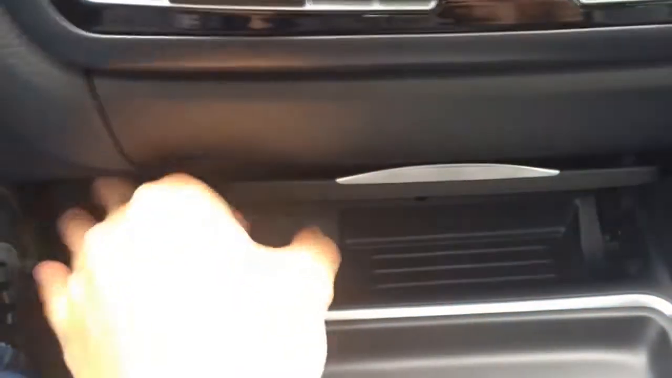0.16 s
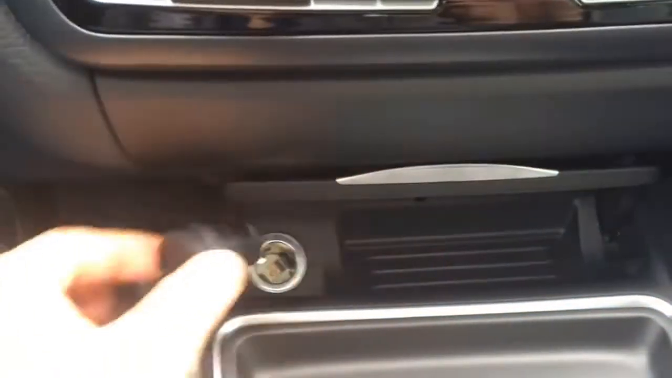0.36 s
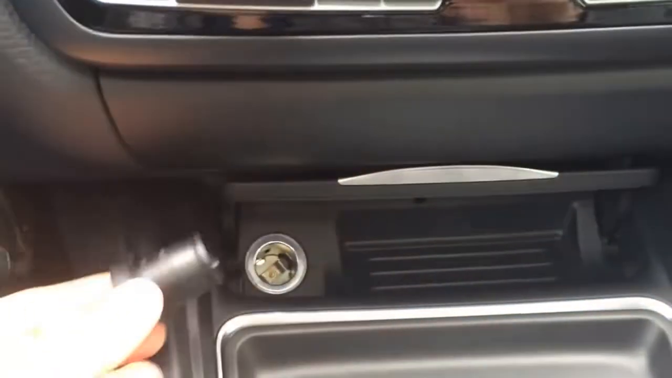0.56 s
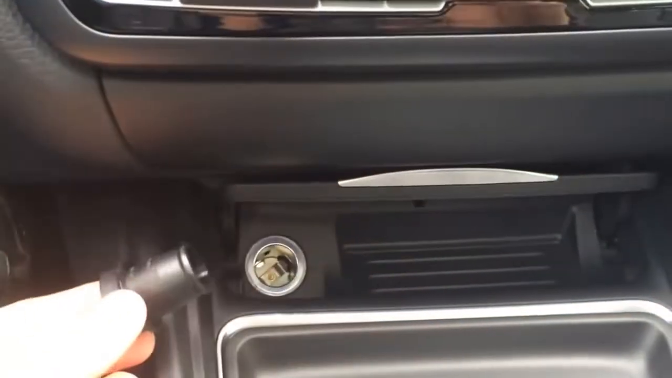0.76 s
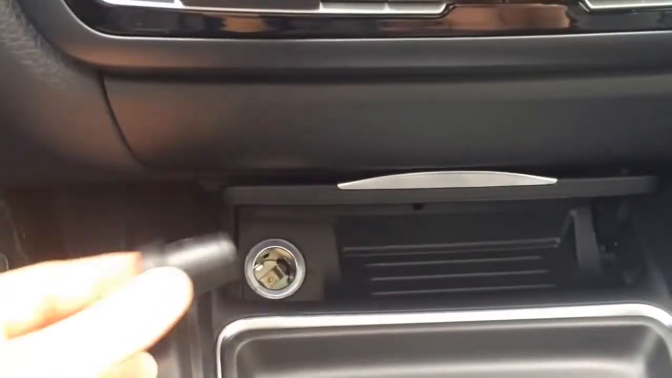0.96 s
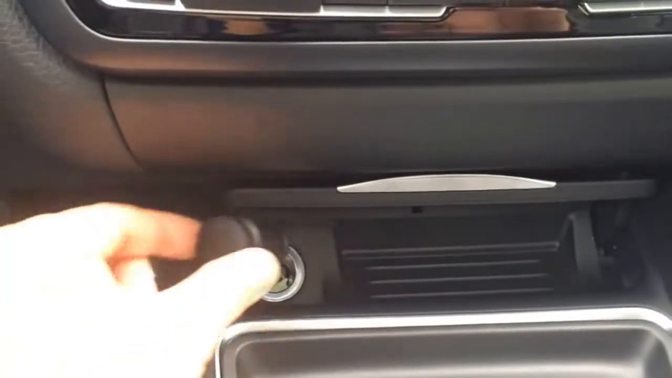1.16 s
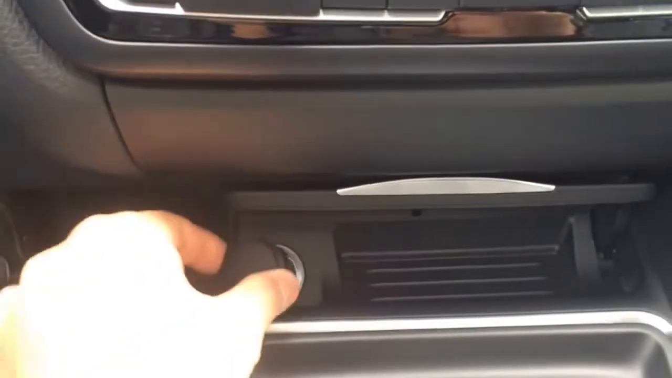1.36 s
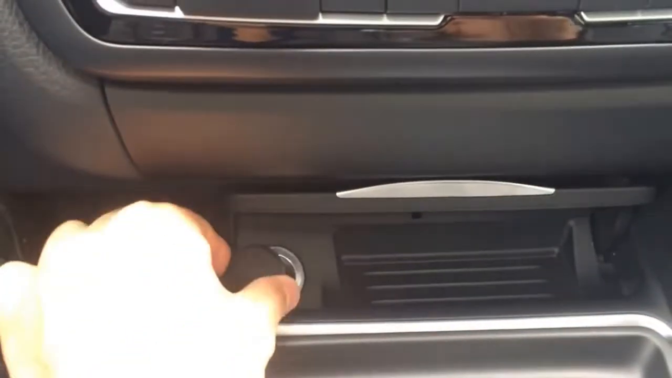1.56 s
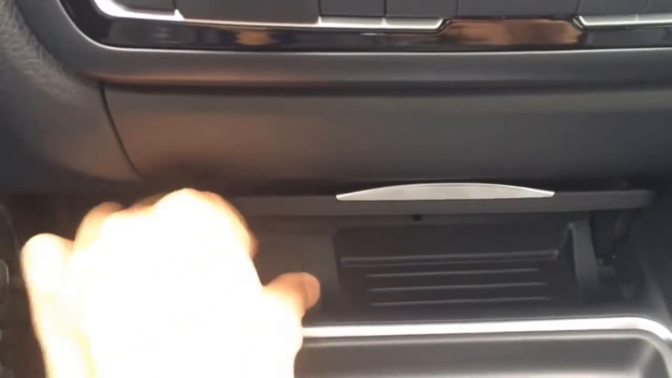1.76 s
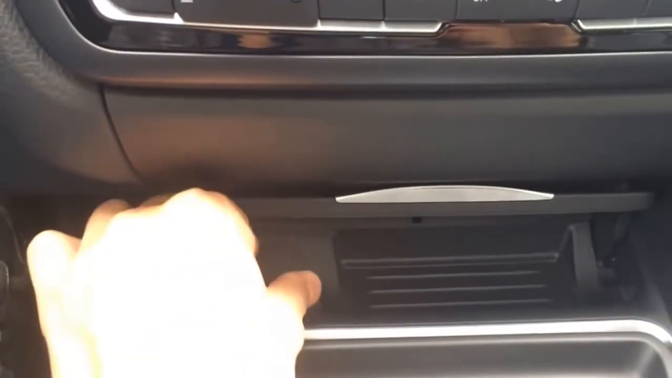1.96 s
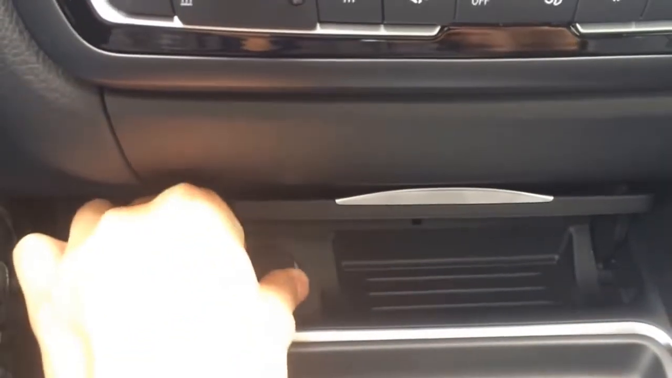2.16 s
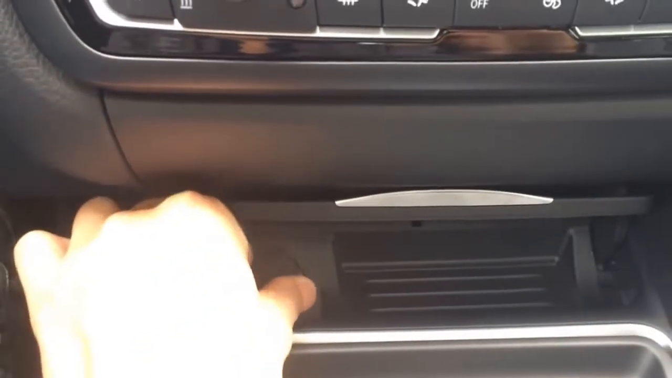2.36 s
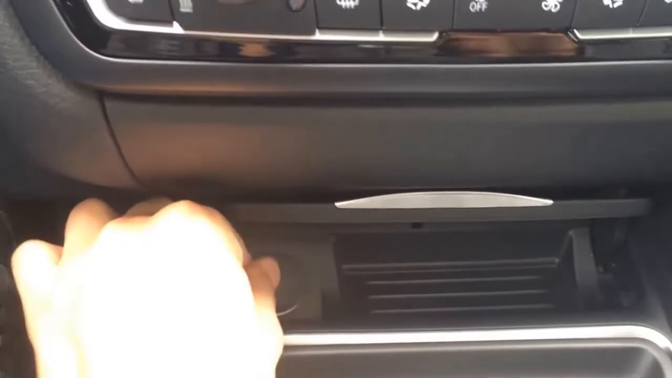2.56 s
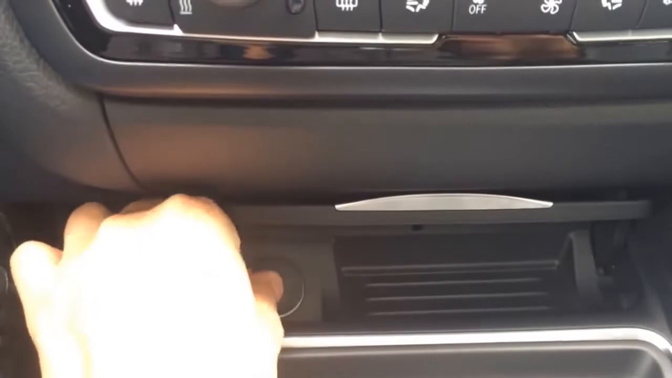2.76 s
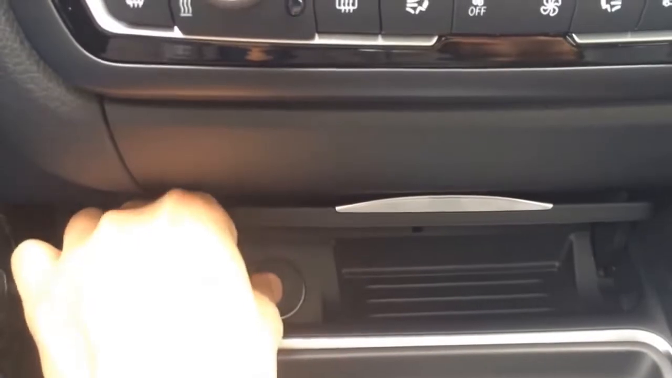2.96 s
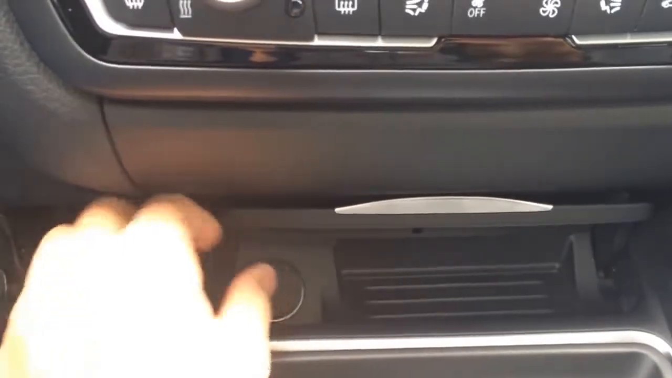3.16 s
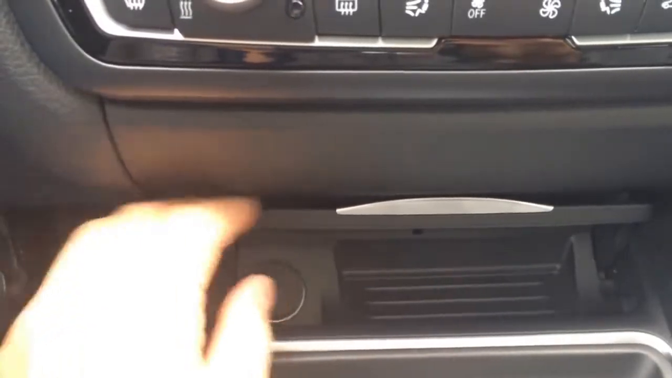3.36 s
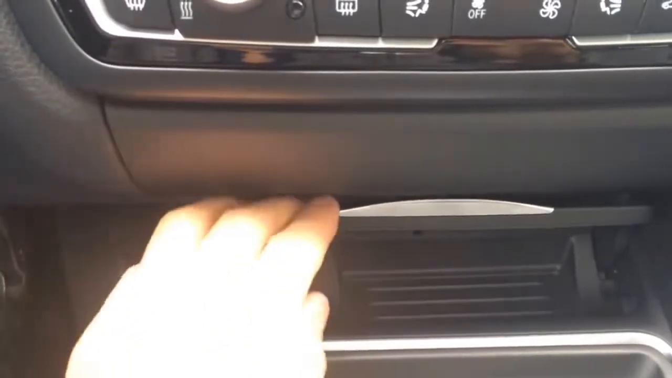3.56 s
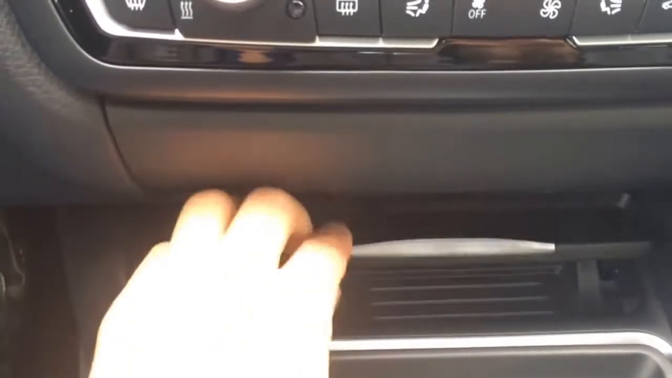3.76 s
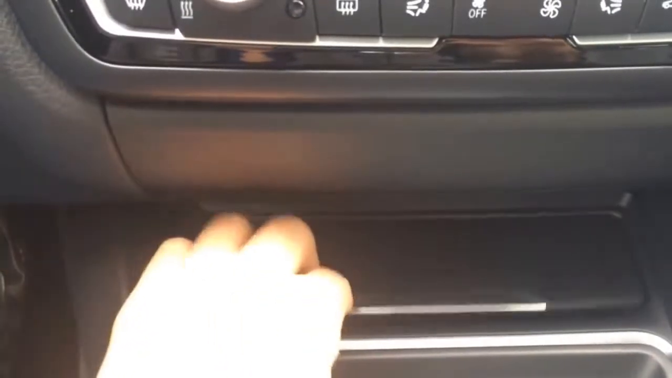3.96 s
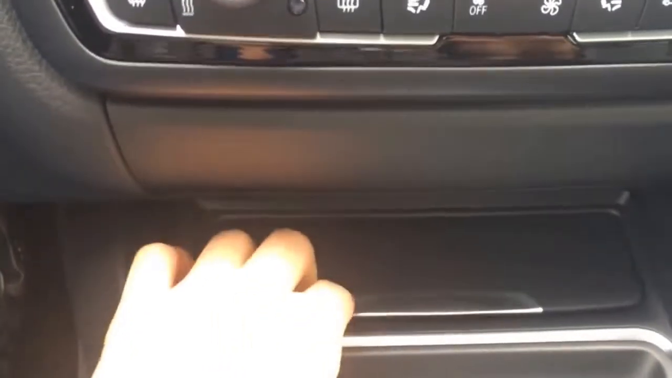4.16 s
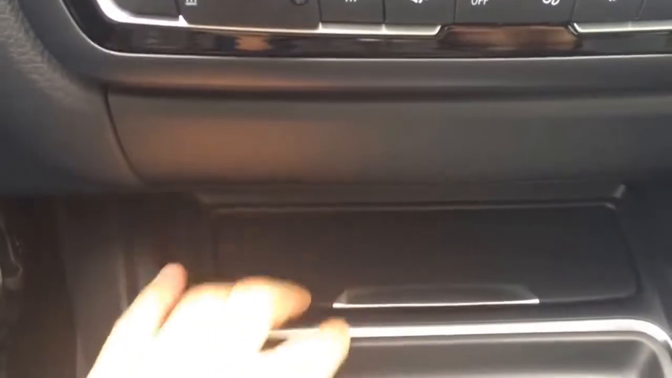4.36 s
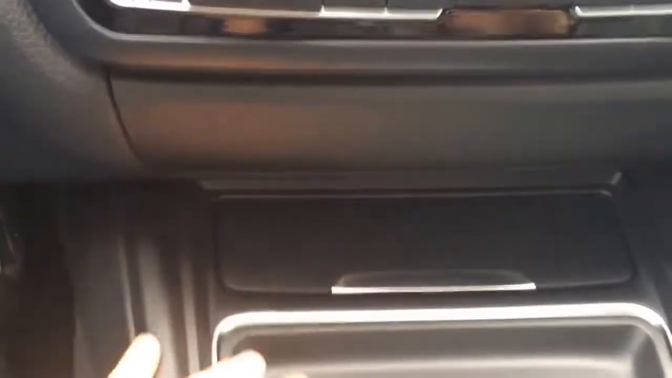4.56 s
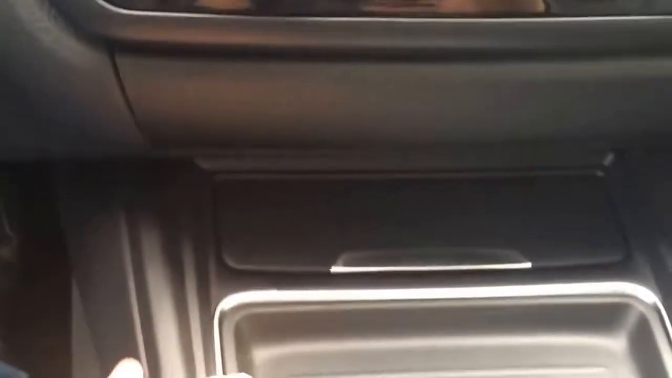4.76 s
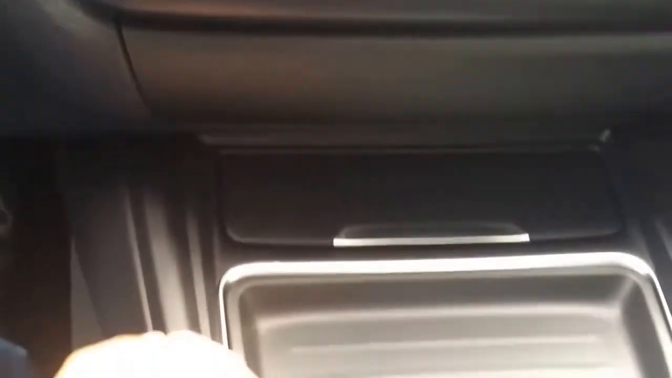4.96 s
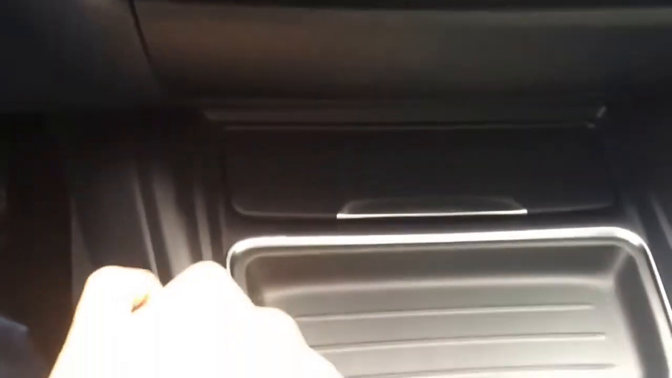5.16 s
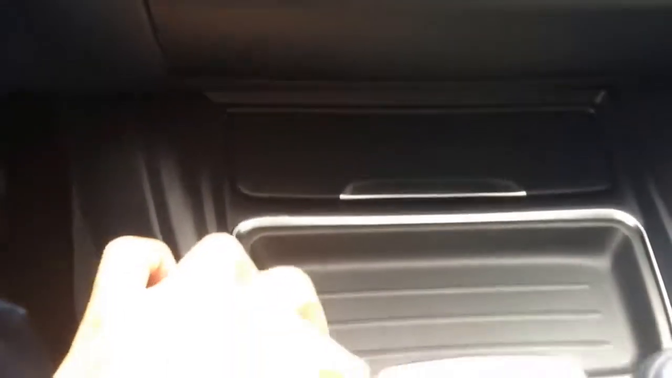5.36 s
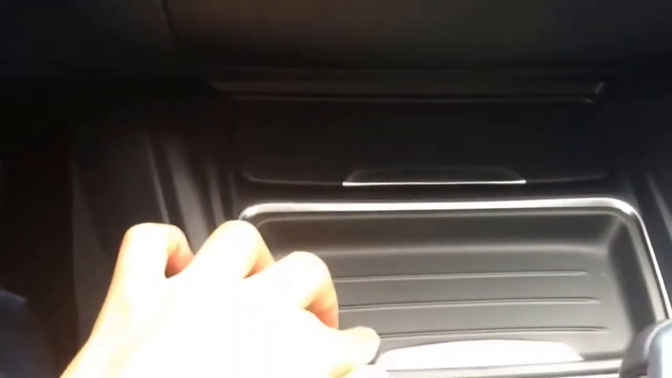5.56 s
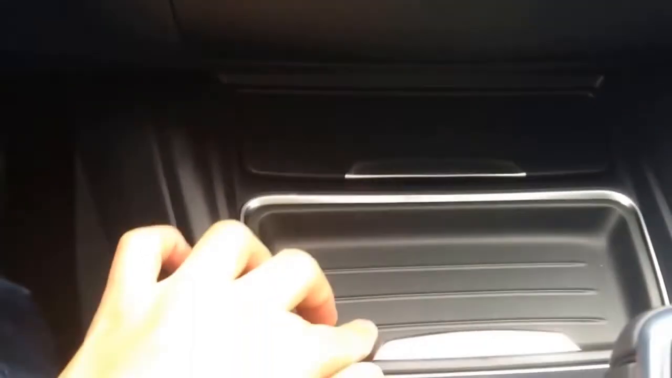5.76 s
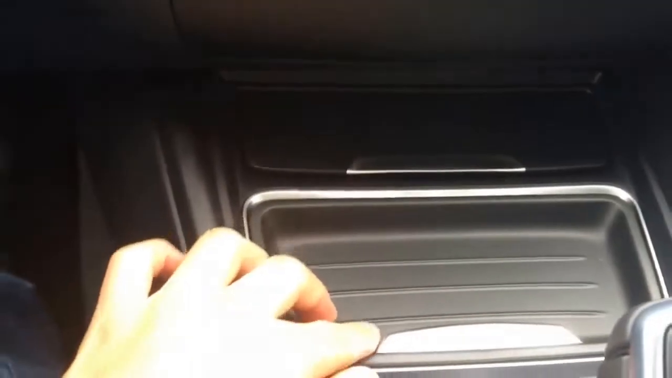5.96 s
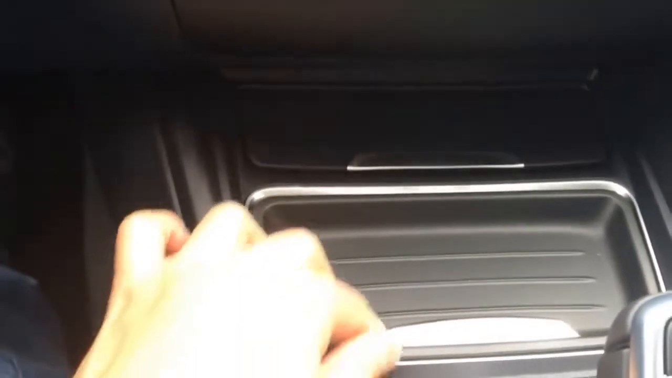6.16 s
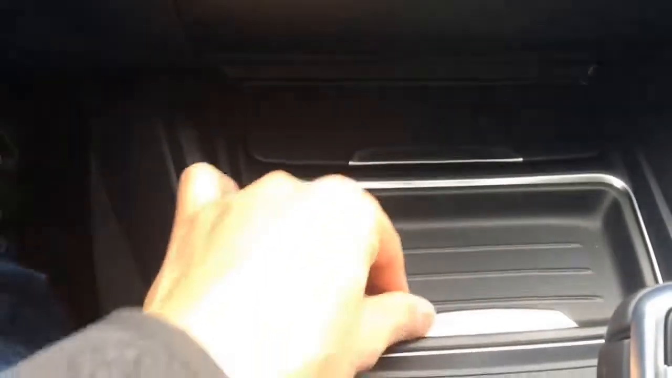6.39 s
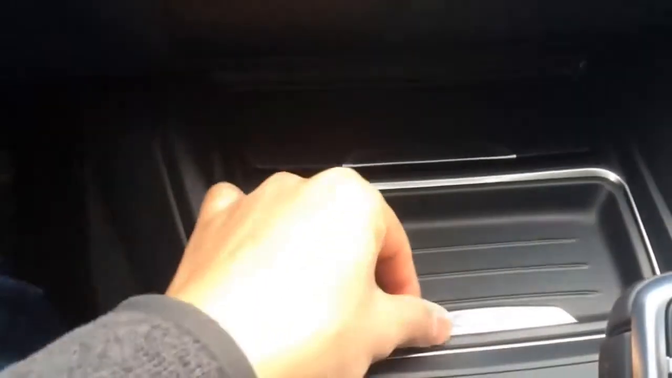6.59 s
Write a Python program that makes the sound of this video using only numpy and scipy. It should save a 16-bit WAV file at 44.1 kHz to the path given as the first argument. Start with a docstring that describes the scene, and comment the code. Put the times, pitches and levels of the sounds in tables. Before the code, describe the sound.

Small hard plastic knocks and sharp snaps over a low steady engine hum, followed by light finger scrapes, a soft clack and faint cloth rustle.

```python
"""Inside a car at idle, heard through a phone microphone with gain control: hands busy at the centre console.
First a plastic plug is worked in its socket: knocks and snaps ring panels and a spring, fingers scrape between.
From 3.3 s the hand is on a sliding cover and tray; from 4 s a sleeve brushes by; after 6 s a fingertip squeaks.
Blows are shaped noise bursts with damped modes; rubbing, sleeve and squeaks are coloured noise.
Under it all lies the engine: steady low tones, boom and far hiss. The small padded cabin answers only the blows."""
import sys
import numpy as np
from scipy import signal
from scipy.fft import rfft, irfft, next_fast_len
from scipy.io import wavfile
from scipy.ndimage import uniform_filter1d, minimum_filter1d, map_coordinates

SR = 44100
rng = np.random.default_rng(int(sys.argv[2]) if len(sys.argv) > 2 else 0)


def master_out(mix):
    """Clip the mix to full scale and print it as 16-bit PCM to the path in sys.argv[1]."""
    frames = np.transpose(np.atleast_2d(mix))
    ceiling = np.clip(frames, -1, 1)
    pcm = np.round(ceiling * 32767).astype(np.int16)
    wavfile.write(sys.argv[1], SR, pcm)


N = 292205

# blows on the plastic, levels relative: start_s, knock_hz, knock_db, thud_db, snap_db,
# scrape_ms (growth time of the lead-in), chatter_ms (until 20 dB down), place (on the part, as a fraction)
CONTACTS = [(.022, 1940, -34.5, -24, -77, 6, 13, .338), (0.041, 1800, -39, -53, -61, 3, 5, 0.3),
            (.121, 1320, -29, -46, -44.5, 6.8, 10, 0.3), (.186, 2550, -48.5, -42, -50, 3, 6, .28),
            (.482, 3300, -60, -60, -77, 1, 4, .3), (1.49, 935, -30.5, -42, -63, .34, 8, 0.25),
            (1.502, 1310, -48, -57, -65, 2, 26, .28), (1.626, 1300, -19.5, -40, -51.5, .37, 10.5, 0.25),
            (1.785, 1620, -34, -31, -58, 2.2, 22, .28), (1.797, 1174, -12.5, -28, -37, .34, 9.5, 0.17),
            (1.841, 1090, -35.5, -29, -72, .3, 18, 0.21), (2.048, 870, -25, -42, -52, 11, 16, .223),
            (2.073, 1300, -28.5, -74, -63, .3, 15, 0.23), (2.098, 990, -42, -56, -63, 3, 11, 0.41),
            (2.146, 1280, -45.5, -58, -51.5, 10, 15, .277), (2.415, 3084, -13, -39, -24.5, 3.8, 12.5, .3),
            (2.417, 760, -3, -19.5, -43, 1, 5, 0.51), (2.421, 800, -24.5, -20.5, -40, .5, -2, 0.44),
            (2.516, 1020, -38, -47, -57.5, .5, 11, 0.38), (2.627, 800, -36.5, -55, -51, 8.6, 6, 0.23),
            (2.67, 1110, -30.5, -26, -51.5, 1.1, 13, 0.37), (2.723, 1500, -47, -45, -51.5, .3, 4.5, 0.33),
            (2.853, 850, -11, -19, 1.5, .05, 6, .22), (2.867, 1980, -23, -33.5, -20, 3, 14.5, .3),
            (3.023, 750, -40.5, -48, -51, .3, -2, 0.34), (3.366, 663, -52.5, -41, -51, 1, -7, 0.18),
            (3.427, 589, -31, -34, -37.5, 4.2, 0.5, 0.18), (3.895, 4200, -56.5, -73.5, -54, .3, 11, .09),
            (4.032, 910, -19, -27.5, -43, .22, 2, 0.016), (4.043, 900, -76, -29, -66, 1.2, 16, 0.15),
            (4.079, 2600, -52.5, -41, -54.5, .57, 16, .1), (6.101, 1605, -45, -66, -60, .3, 30, 0.14)]
# frequencies where a blow's colour is read: pitch_hz
COLOUR_POINTS_HZ = [350, 660, 1250, 2100, 3200, 5600, 11000]
# modes of the console panels and socket: pitch_hz, relative_level_db, t60_s
CONSOLE_MODES = [(270, -2, .09), (371, -3, .07), (435, 0, .07), (558, 0, .08), (670, 0, .06), (858, 0, .06),
                 (1032, 0, .05), (1160, 0, .05), (1425, 0, .06), (1565, 0, .05), (1690, -2, .04),
                 (2075, 0, .05), (2780, 1, .06), (3200, -1, .035), (4400, 2, .045), (5060, 2, .04),
                 (6200, -3, .02), (6780, -2, .025), (7360, -3, .02)]
# modes of the sliding cover and tray: pitch_hz, relative_level_db, t60_s
COVER_MODES = [(265, -8, .07), (373, 0, .08), (480, -10, .05), (680, -3, .045), (893, 0, .05),
               (1030, -4, .04), (1310, -3, .05), (1680, -4, .03), (2100, -3, .03), (2900, -2, .03),
               (3340, -3, .04)]
# modes of the small steel spring: pitch_hz, relative_level_db, t60_s
SPRING_MODES = [(3741, -9, .26), (4215, -9, .18), (4797, 0, .3), (4812, -7, .3), (5550, -13, .3),
                (8554, -10, .14)]
# the car's body, pushed by firm blows: pitch_hz, relative_level_db, t60_s
BODY_MODES = [(103, 7.5, .2), (187, 0.5, .12)]
# how fast the cabin's answer dies away: pitch_hz, t60_s
CABIN_DECAY = [(200, 0.076), (1000, 0.15), (4000, .07), (12000, 0.082)]
# finger strokes on plastic, before the surface colours them:
# peak_s, rise_s, fall_s, rumble_db (panel), scrape_db, hiss_db
STROKES = [(.026, 0.027, 0.038, -46.5, -52, -58.5), (.08, 0.028, 0.021, -64, -61.5, -68),
           (.4, 0.3, 0.1, -68, -77, -72.5), (1.27, 0.11, 0.11, -77, -72, -70.5),
           (1.37, 0.076, 0.026, -74, -73, -65.5), (2.03, 0.056, 0.18, -54, -66, -67),
           (2.144, 0.05, 0.028, -60, -62.5, -75), (2.288, 0.046, 0.031, -56, -59.5, -64),
           (2.47, 0.11, 0.054, -72, -62, -67), (2.575, 0.025, 0.048, -59, -62.5, -71),
           (2.64, 0.041, 0.037, -54, -58.5, -62), (2.842, 0.08, 0.036, -48.5, -46, -52.5),
           (2.93, 0.039, 0.01, -55.5, -63.5, -85), (3.05, 0.032, 0.038, -72, -57.5, -60),
           (3.17, 0.12, 0.064, -54.5, -50.5, -49.5), (3.25, .06, 0.097, -66.5, -63, -54),
           (3.38, 0.073, 0.074, -54, -61, -56), (3.434, 0.06, 0.053, -41, -53.5, -52.5),
           (3.56, 0.16, 0.047, -59, -68, -73.5), (3.65, 0.059, 0.095, -58, -60.5, -60),
           (3.722, 0.065, 0.062, -64, -62, -58), (3.82, 0.082, .08, -61.5, -69, -72),
           (3.92, .025, .04, -55, -55, -63), (3.956, 0.11, 0.079, -54, -59.5, -63.5),
           (4.68, .06, .06, -64, -64, -75), (5.07, .025, 0.033, -60, -60.5, -80),
           (6.232, 0.081, .1, -63, -68, -69), (6.34, 0.082, 0.14, -64, -68, -68),
           (6.51, 0.061, 0.12, -74, -67, -64)]
# the hand never lies quite still, same stage as the strokes: level_db of rumble, scrape, hiss
RESTING_DB = [-65.5, -83.5, -79]
# colours of rumble, scrape and hiss, one list each: pitch_hz, relative_level_db (per Hz)
RUB_COLOURS = [
    [(200, -25.5), (450, 0.5), (900, -7.5), (1800, -21.5)],
    [(700, -30), (1500, -2), (2150, 0.5), (2700, -9), (3400, -1.5), (4500, -5.5), (5300, -10),
     (8000, -10.5)],
    [(3500, -15.5), (6200, -0.5), (7500, -3), (9000, -2.5), (11000, -3), (15500, -2.5)],
]
# the textured plastic's resonances under a finger: pitch_hz, width_hz (widened in use), relative_level_db
SURFACE = [(2340, 170, -3), (3130, 46, 1), (5100, 51, -8.5), (5900, 40, -2), (6830, 45, 0),
           (7870, 38, -7.5), (9000, 86, -1), (10200, 160, -9.5)]
# a fingertip on the tray's handle: start_s, length_s, pitch_hz, width_hz, level_db (rms at mid-burst)
SQUEAKS = [(6.089, 0.0091, 3020, 301, -58), (6.347, 0.042, 3060, 252, -67),
           (6.469, 0.048, 2940, 300, -60.5)]
# the sleeve brushing by as the arm moves: time_s, rustle_db, swish_db (rms, before wavering)
SLEEVE = [(4.04, -82, -81), (4.12, -72, -75), (4.299, -68.5, -64), (4.44, -70, -59.5), (4.6, -64, -66.5),
          (4.77, -63, -70.5), (5.05, -64.5, -67.5), (5.3, -65.5, -75), (5.502, -69.5, -82),
          (6.09, -82.5, -100)]
# cloth colours of rustle and swish, one list each: pitch_hz, relative_level_db (per Hz)
CLOTH_COLOURS = [
    [(600, -6.5), (1500, 0.5), (2500, -1), (6500, -6), (10000, -11), (15500, -19)],
    [(2500, -12.5), (5000, -1), (9000, -1.5), (15500, -1)],
]
# steady low engine tones: pitch_hz
TONES_HZ = [33.2, 132.8, 149.4, 166.3, 199.2, 246]
# rms of those tones before wavering: level_db
TONES_DB = [-48.5, -46.5, -61.5, -60, -59.5, -63.5]
# colour of the body boom: pitch_hz, relative_level_db (per Hz)
BOOM = [(14, -35), (24, -8.5), (81, -2), (118, -2), (136, -2), (156, -8.5), (180, -10.5), (231, -11.5),
        (335, -24.5), (380, -29), (451, -18.5), (544, -41), (677, -30), (816, -48.5), (1000, -35.5),
        (1300, -61.5), (2200, -120)]
# colour of the far hiss: pitch_hz, relative_level_db (per Hz)
HISS = [(410, -38), (700, -4), (1190, -7.5), (1300, -9.5), (1520, -11.5), (2310, -16.5), (2490, -17),
        (2770, -20.5), (15500, -32.5)]

COVER_FROM_S = 3.3  # later blows ring the cover and tray
THUD_HZ, SNAP_HZ = 350, 5000  # where the finger's weight and the hard edge sound
KNOCK_FALL_DB, THUD_FALL_DB, SNAP_FALL_DB = 8, 19, 5  # loss one octave off the centre
STEEPENS = 2.8  # the loss grows with this power of the octaves
AIR_LOSS_DB = 7.5  # TOP_HZ lies this far under the highest colour point
CONSOLE_RING_DB, COVER_RING_DB, TAIL_DB = -3.5, 5.5, -3  # modes and cabin over the blow's colour
SOFT_LOSS_DB = 1.5  # ring and tail lost per doubling of (1 + scrape_ms)
EDGE_DB = 16.5  # a stroke's loss one rise before or one fall after its peak
BOOM_DB, HISS_DB = -45, -67.5  # rms
TOP_HZ = 15500  # top of the microphone's band


def contacts():
    """A scrape grows into a blow, then chatter; the blow rings part, body and cabin, bright snaps the spring."""
    out, lead, size = np.zeros(N + SR), 2048, 16384  # samples
    t = np.arange(size // 2) / SR
    hz = np.fft.rfftfreq(size, 1 / SR)
    spring = ring(SPRING_MODES, np.arange(size - lead) / SR, np.zeros(len(SPRING_MODES)))
    for s, knock_hz, knock_db, thud_db, snap_db, scrape_ms, chatter_ms, place in CONTACTS:
        colour = colour_of(knock_hz, knock_db, thud_db, snap_db)
        clack = causal(along(colour, hz) + 5 - 0.8 * np.log2(hz / 1000 + 0.058))
        clack *= .45 + .55 * 1j * hz / (1j * hz + 1500)  # lower down the modes carry the sound
        force = contact_force(t - lead / SR, scrape_ms, chatter_ms)
        sound = irfft(rfft(force, size) * clack, size)

        soft_db = SOFT_LOSS_DB * np.log2(1 + max(scrape_ms, 0))  # a slow landing damps the part
        on_cover = s > COVER_FROM_S
        part = np.array(COVER_MODES if on_cover else CONSOLE_MODES)
        ring_db = COVER_RING_DB if on_cover else CONSOLE_RING_DB
        # modes with a node at the blow stay weak
        motion = np.abs(np.cos(np.pi * place * np.arange(1, len(part) + 1)))
        mode_db = along(colour, part[:, 0]) + 20 * np.log10(0.17 + 0.4 * motion) + ring_db - soft_db
        panels = ring(part, t, mode_db) * (1 - np.exp(-t / 0.0004))
        body = ring(BODY_MODES, t, np.full(len(BODY_MODES), thud_db - 13)) * (1 - np.exp(-t / 0.012))
        tail_colour = [(f, db - 2.09 * np.log2(f / 2500) + TAIL_DB - soft_db) for f, db in colour]

        sound[lead:lead + len(t)] += panels + body + cabin(tail_colour, t)
        sound[lead:] += spring * amp(1.3 * snap_db - 45.5)
        start = round(s * SR) + SR // 4 - lead - 30  # the part moves 30 samples before start_s
        out[start:start + size] += sound
    return out[SR // 4:SR // 4 + N]


def contact_force(u, scrape_ms, chatter_ms):
    """Noise force around a blow at u = 0 s: a growing scrape, the blow, a fading string of tiny impacts."""
    before = amp(-5.5) * np.exp(np.minimum(u, 0) * 1000 / max(scrape_ms, .03))
    after = amp(-20 * (np.maximum(u, 0) * 1000 / max(chatter_ms, .2)) ** 1.3)
    impacts = amp(3 * np.repeat(rng.standard_normal(len(u) // 32), 32))
    return np.where(u < 0, before, after) * impacts * rng.standard_normal(len(u))


def colour_of(knock_hz, knock_db, thud_db, snap_db):
    """Thud, knock and snap add as three humps of power; small parts radiate no bass."""
    points_hz = np.array(COLOUR_POINTS_HZ)

    def hump(hz, db, fall_db):
        octaves = np.abs(np.log2(points_hz / hz))
        return amp(db - fall_db * octaves ** STEEPENS) ** 2

    power = hump(THUD_HZ, thud_db, THUD_FALL_DB)
    power += hump(knock_hz, knock_db, KNOCK_FALL_DB)
    power += hump(SNAP_HZ, snap_db, SNAP_FALL_DB)
    level_db = 10 * np.log10(power)
    return [(100, thud_db - 34.5), *zip(points_hz, level_db), (TOP_HZ, level_db[-1] - AIR_LOSS_DB)]


def cabin(colour, t):
    """The padded cabin answers with noise of the given colour, each frequency dying at its own speed."""
    hz, frames, z = signal.stft(rng.standard_normal(len(t)), SR, nperseg=256, noverlap=192)
    gain_db = along(colour, hz)[:, None] - 60 * frames / along(CABIN_DECAY, hz)[:, None]
    tail = signal.istft(z * amp(gain_db), SR, nperseg=256, noverlap=192)[1][:len(t)]
    return tail * (1 - np.exp(-t / 0.0071))  # builds up over about 7 ms


def rubbing():
    """Stick-slip noise, uneven over milliseconds, coloured by panel, plastic surface and air."""
    grip_db = 1.4 * wobble(51) + 1.9 * wobble(430)
    rub = sum(gain * unit(amp(grip_db) * noise(colour)) for gain, colour in zip(rub_levels(), RUB_COLOURS))
    hz, _, z = signal.stft(rub, SR, nperseg=512)
    peaks = sum(amp(db) / (1 + ((hz - c) / (w + 100)) ** 2) for c, w, db in SURFACE)
    # the rubbing's colour drifts in random patches, smoothed over 5 bins and 14 frames
    patches = uniform_filter1d(rng.standard_normal(z.shape), 5, 0)
    patches = uniform_filter1d(patches, 14, 1)
    z = z * amp(2.2 * unit(patches) - 3) * (1 + 0.25 * peaks)[:, None]
    return signal.istft(z, SR, nperseg=512)[1][:N]


def rub_levels():
    """Gain over time of rumble, scrape and hiss: resting hand and strokes add as powers."""
    t = np.arange(0, N + 64, 64) / SR
    s, rise, fall, *peaks_db = np.transpose(STROKES)[:, :, None]
    edge_s = np.maximum(np.where(t < s, rise, fall), .004)
    shape_db = -EDGE_DB * ((t - s) / edge_s) ** 2
    gains = []
    for peak_db, rest_db in zip(peaks_db, RESTING_DB):
        power = np.sum(amp(peak_db + shape_db) ** 2, axis=0) + amp(rest_db) ** 2
        gains.append(np.interp(np.arange(N) / SR, t, np.sqrt(power)))
    return gains


def squeaks():
    """Short stick-slip bursts: noise in one narrow resonance, swelling and fading."""
    t = np.arange(N) / SR
    out = np.zeros(N)
    for s, length, hz, width, db in SQUEAKS:
        swell = np.sin(np.pi * np.clip((t - s) / length, 0, 1))
        resonance = [(hz - 3 * width, -30), (hz - width / 2, -3), (hz, 0),
                     (hz + width / 2, -3), (hz + 3 * width, -30)]
        out += amp(db) * swell * noise(resonance)
    return out


def sleeve():
    """Cloth on cloth: a smooth rustle and a brighter swish, each wavering a little."""
    t = np.arange(N) / SR
    s, *levels = np.transpose(SLEEVE)
    return sum(amp(np.interp(t, s, db, -120, -120) + 0.71 * wobble(14)) * noise(colour)
               for db, colour in zip(levels, CLOTH_COLOURS))


def engine():
    """Idling tones share one slightly unsteady crank speed; body boom and far hiss lie under them."""
    turn = np.cumsum(1 + .004 * wobble(2)) / SR  # s, stretched by the unsteady crank
    tones = np.zeros(N)
    for hz, db in zip(TONES_HZ, TONES_DB):
        level = np.sqrt(2) * amp(db + 1.2 * wobble(5.7))
        tones += level * np.sin(2 * np.pi * (hz * turn + rng.random()))
    return tones + amp(BOOM_DB) * noise(BOOM) + amp(HISS_DB) * noise(HISS)


def ring(modes, t, gain_db):
    """Damped sines as a struck part's modes; neighbours start in opposite directions."""
    hz, db, t60 = np.transpose(modes)[:, :, None]
    phase = np.pi * np.arange(len(hz))[:, None]
    level = amp(db + gain_db[:, None] - 60 * t / t60)
    return np.sum(level * np.sin(2 * np.pi * hz * t + phase), axis=0)


def causal(db):
    """The minimum-phase response with these dB gains on an FFT grid."""
    cepstrum = irfft(db * np.log(10) / 20)
    half = len(cepstrum) // 2
    cepstrum[1:half] *= 2
    cepstrum[half + 1:] = 0
    return np.exp(rfft(cepstrum))


def noise(colour):
    """Noise of rms 1 with the given colour, falling steeply outside it."""
    m = next_fast_len(N + 8192)
    closed = [(colour[0][0] * .6, -120), *colour, (colour[-1][0] * 1.5, -120)]
    gain = amp(along(closed, np.fft.rfftfreq(m, 1 / SR)))
    return unit(irfft(rfft(rng.standard_normal(m)) * gain, m)[:N])


def wobble(rate):
    """A smooth random curve, rate knots a second."""
    knots = rng.standard_normal(int(N * rate / SR) + 4)
    return map_coordinates(knots, [np.arange(N) * rate / SR])


def along(points, hz):
    """Values between (Hz, value) points on a log frequency axis."""
    f, v = np.transpose(points)
    return np.interp(np.log(hz + 1), np.log(f + 1), v)


def amp(db):
    """Decibels to linear gain."""
    return 10 ** (np.asarray(db) / 20)


def unit(x):
    """Scale to rms 1."""
    return x / np.sqrt(np.mean(x ** 2) + 1e-20)


def scene():
    """Hands on the console in front, the engine behind; one channel."""
    return (contacts() + rubbing() + squeaks() + sleeve() + engine())[None]


def gain_control(dry):
    """Duck by 0.4 dB for each dB a peak passes -3 dB, then recover with a 0.2 s time constant."""
    step = 441  # samples, 10 ms
    over_db = np.maximum(20 * np.log10(np.abs(dry[0]) + 1e-9) + 3, 0)
    held_db = -minimum_filter1d(-over_db, size=step)  # running maximum
    coarse = held_db[::step]
    release = np.exp(-np.arange(0, SR, step) / (.2 * SR))
    # each step takes the strongest earlier peak, weakened by its age
    duck_db = np.max([np.pad(coarse, (i + 1, 0))[:len(coarse)] * g for i, g in enumerate(release)], axis=0)
    return dry * amp(-.4 * np.interp(np.arange(N), np.arange(len(coarse)) * step, duck_db))


def saturate(x):
    """The input stage rounds off peaks towards 0.95."""
    return x / (1 + np.abs(x / .95) ** 4) ** (1 / 4)


def microphone_band(x):
    """The microphone's 30 Hz high-pass and a steep loss around the top of its band."""
    m = next_fast_len(N + 8192)
    hz = np.fft.rfftfreq(m, 1 / SR)
    bass_cut = (1j * hz / (1j * hz + 30)) ** 2
    over = np.clip((hz - TOP_HZ + 500) / 1500, 0, 1)
    return irfft(rfft(x, m) * bass_cut * amp(-90 * over ** 1.5), m)[:, :N]


def record(dry):
    """The phone: gain control, then input saturation, then the band limit."""
    return microphone_band(saturate(gain_control(dry)))


dry = scene()
out = record(dry)
master_out(out)
```